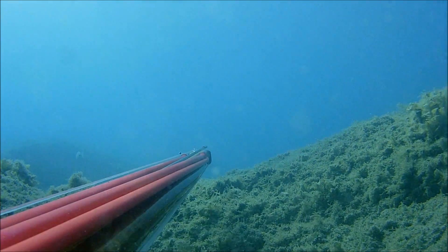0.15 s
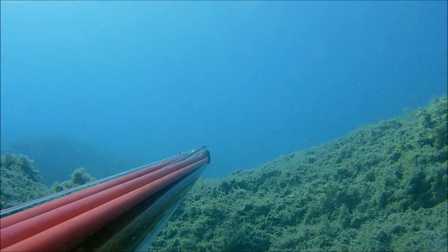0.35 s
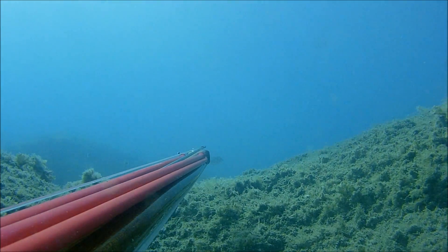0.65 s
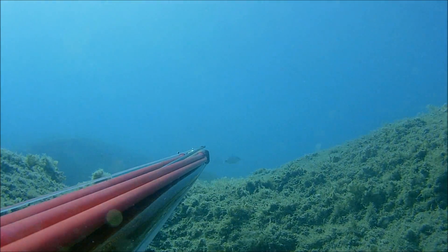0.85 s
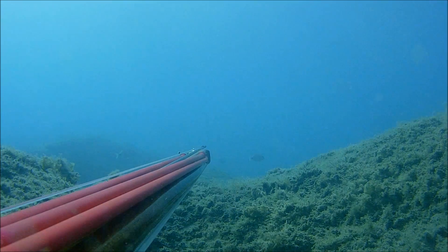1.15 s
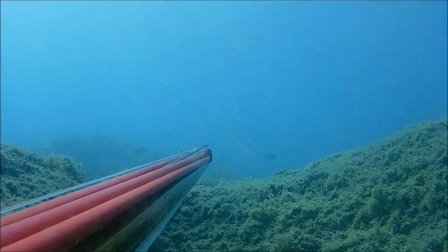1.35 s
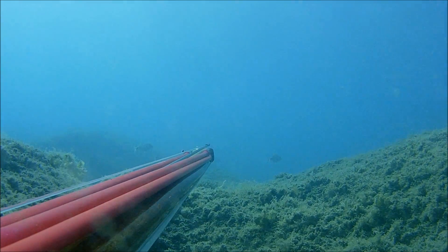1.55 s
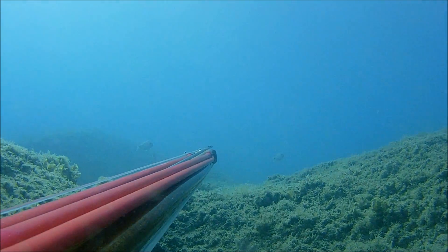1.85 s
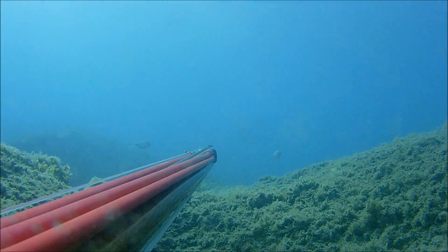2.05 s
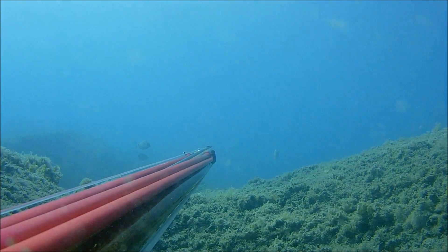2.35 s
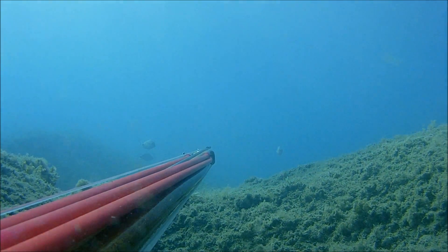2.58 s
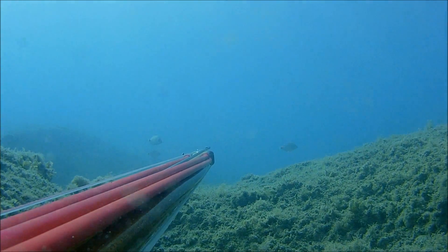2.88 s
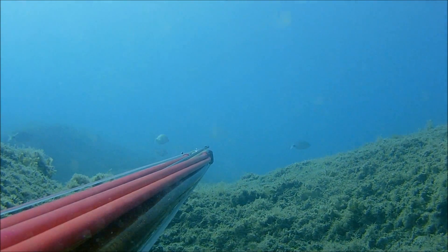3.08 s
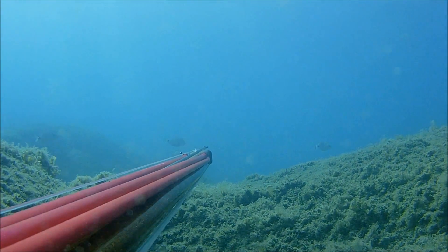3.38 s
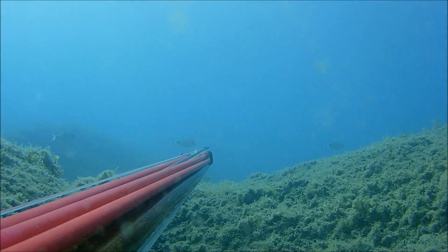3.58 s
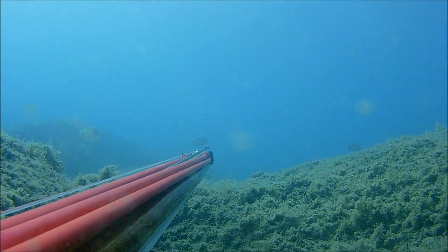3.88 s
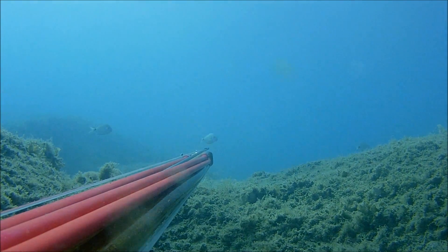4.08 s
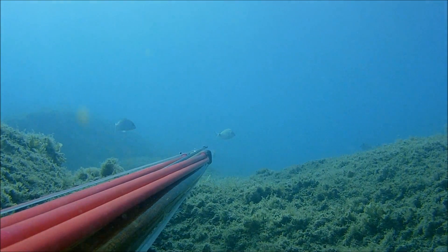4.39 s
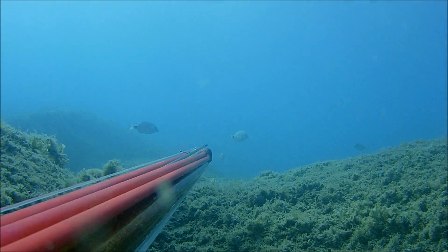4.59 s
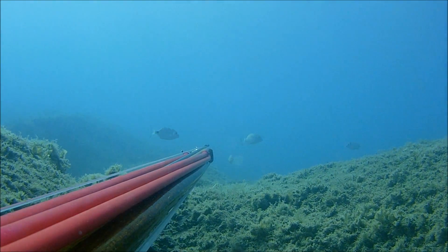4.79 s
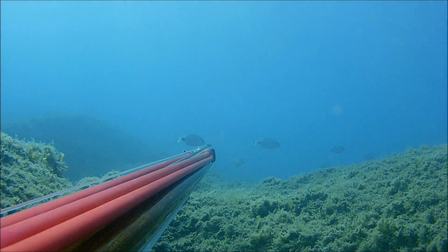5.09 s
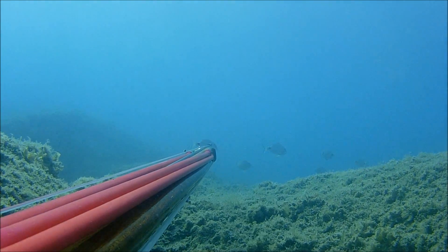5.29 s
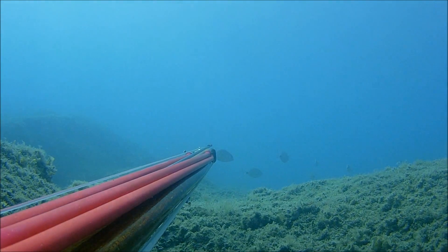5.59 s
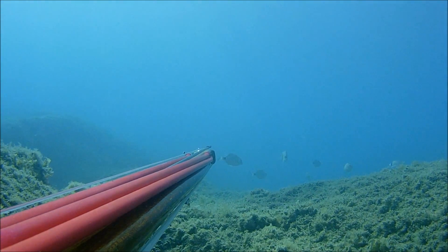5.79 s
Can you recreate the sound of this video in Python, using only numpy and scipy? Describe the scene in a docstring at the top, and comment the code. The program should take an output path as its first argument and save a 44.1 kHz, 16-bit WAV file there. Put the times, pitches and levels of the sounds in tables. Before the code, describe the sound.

A camera mounted on a speargun hears a quiet seabed: scattered shrimp snaps, near and far, like tiny pops and ticks, each with a brief rocky scatter. Low rumble settles early into gentle wash and faint hiss. The loudest snap cracks at about 2.3 seconds, then low handling bumps; later clicks continue unevenly, with another dull bump late. Mono, boxy, with enclosed midrange-to-treble clicks.

```python
"""Weedy, rocky seabed: snapping shrimp crackle, heard by a camera in a waterproof housing on a speargun.
Each snap is a claw rasp and a collapsing bubble, scattered by rocks and filtered by the ringing housing.
Near snaps come from a table, a colony is scattered at random, and far snaps merge into a sizzle.
Dull handling bumps ring the gun's low modes; shaped noise makes a soft wash and a slow rumble of flow."""
import sys
import numpy as np
from scipy import signal
from scipy.fft import rfft, irfft
from scipy.io import wavfile

SR = 44100
rng = np.random.default_rng(int(sys.argv[2]) if len(sys.argv) > 2 else 0)


def to_wav(s):
    """Save 16-bit WAV."""
    ch = np.atleast_2d(s).T  # columns
    pcm = np.round(np.clip(ch, -1, 1) * 32767)  # PCM
    wavfile.write(sys.argv[1], SR, pcm.astype(np.int16))


N = 261962
FRAME = 2048  # samples per snap
BUBBLE_LOW_HZ, BUBBLE_HIGH_HZ = 1900, 8000  # brightness slope acts between these
WALL_ECHO_S, WALL_ECHO_DB = .00082, 2.5


def undb(db):
    """Decibels to amplitude gain."""
    return 10 ** (np.asarray(db) / 20)


def unit(x):
    """Scale to rms 1."""
    return x / np.sqrt(np.mean(x ** 2))


def unit_energy(waves):
    """Scale each row to energy 1."""
    return waves / np.linalg.norm(waves, axis=1, keepdims=True)


def colour(points, hz):
    """Gain of a (Hz, dB) spectrum, interpolated over log frequency."""
    point_hz, level_db = np.transpose(points)
    return undb(np.interp(np.log(hz + 1), np.log(point_hz), level_db))


def resonance(hz, centre_hz, width_hz):
    """Response of one damped mode, 1 at its centre."""
    damping = 1j * hz * width_hz
    return damping / (centre_hz ** 2 - hz ** 2 + damping)


def delay(hz, lag_s):
    """Phase response of a pure delay."""
    return np.exp(-2j * np.pi * hz * lag_s)


def noise(gain):
    """Noise of rms 1 with the spectrum gain(hz)."""
    spectrum = rfft(rng.standard_normal(N))
    return unit(irfft(spectrum * gain(np.fft.rfftfreq(N, 1 / SR)), N))


def add(out, start_s, sound):
    """Mix a sound in from start_s."""
    start = int(np.clip(start_s * SR, 0, N - 1))
    out[start:start + len(sound)] += sound[:N - start]


def bubble_tilt(hz, db_per_octave):
    """Spectral slope of a bubble: small ones snap bright, large ones dull."""
    return undb(db_per_octave * np.log2(np.clip(hz, BUBBLE_LOW_HZ, BUBBLE_HIGH_HZ) / SR))


def snaps(rows, claw_db=-12, claw_lead_s=.0022, rock_t60_s=.042, far_t60_s=.11, far_db=-20, echo_spread=.065):
    """Claw rasp, bubble pulse with its crevice ring, rock echoes and wall echo, through the housing."""
    start_s, level_db, tilt_db_per_oct, ring_hz, ring_db = np.transpose(rows)[:, :, None]
    hz, t = np.fft.rfftfreq(FRAME, 1 / SR), np.arange(FRAME) / SR
    lead_s, level_window_s = .004, .01
    ring_q = 3.9
    chance = rng.standard_normal((len(rows), FRAME))
    spray = chance ** 3  # sparse, uneven spikes

    # the rasp fills the frame's end, which wraps round to precede the collapse
    claw = undb(claw_db) * rfft(unit_energy(spray * (t > t[-1] - claw_lead_s)))

    # fainter snaps are further off: more echo against direct sound, up to a limit
    near_snap_db, near_echo_db, echo_db_per_db, echo_most_db = -40, -4, 1, -2.5
    echo_db = near_echo_db + echo_db_per_db * (near_snap_db - level_db)
    echo_db = np.minimum(echo_db, echo_most_db)
    fade = undb(-60 * t / rock_t60_s) + undb(far_db - 60 * t / far_t60_s)
    fade = fade * (t > .0012) * (t < t[-1] - lead_s)
    rocks = undb(echo_db) * rfft(unit_energy(spray * fade))

    ring = 1 + (undb(ring_db) - 1) * resonance(hz, ring_hz, ring_hz / ring_q)
    bubble = bubble_tilt(hz, tilt_db_per_oct) * ring

    # echo off the case wall, its lag varied from snap to snap
    wall_lag_s = WALL_ECHO_S * (1 + echo_spread * np.tanh(chance[:, :1]))
    wall = 1 + undb(WALL_ECHO_DB) * delay(hz, wall_lag_s)

    spectra = (1 + claw + rocks) * bubble * wall * housing(hz) * delay(hz, lead_s)
    waves = unit_energy(irfft(spectra)) * undb(level_db) * np.sqrt(level_window_s * SR)
    out = np.zeros(N)
    for snap_s, wave in zip(start_s[:, 0], waves):
        add(out, snap_s - lead_s, wave)
    return out


# nearest snaps; level is rms over 10 ms, ring is the bubble's in its crevice:
# (start_s, level_db, brightness_db_per_octave, ring_hz, ring_lift_db)
NEAR_SNAPS = [(.0309, -49.5, 5, 8300, 4), (.2156, -50, 2, 5360, 22), (.2353, -45.5, -15, 2330, 17),
              (.4881, -43.5, 2, 8300, 3), (.6662, -43.5, 2.5, 2700, 5), (.7451, -40.5, -6, 5800, 8),
              (.7616, -40, 3.5, 2720, 5), (.8007, -46.5, 1, 2400, 7), (1.1667, -44.5, -2, 3600, 24),
              (1.3622, -51.5, -8, 3980, 24), (1.4904, -50.5, 6, 3200, 7), (1.5312, -40.5, 3.5, 3520, 6),
              (1.58, -51.5, -2, 2400, 11), (1.7708, -47.5, 9.5, 2660, 12), (1.809, -45, 1, 2400, 7),
              (2.0713, -44.5, 10, 3150, 5.5), (2.2562, -27, 8.5, 3260, 10), (2.3326, -43.5, 5, 3600, 21),
              (2.4976, -47, 4.5, 3300, 14), (2.7637, -41, -6, 5610, 29), (2.8405, -42, 3, 3180, 14),
              (3.032, -47, -3, 4500, 4), (3.159, -40, 4.5, 4100, 29), (3.2834, -42, -1.5, 3660, 13),
              (3.3112, -37.5, -8, 2670, 20), (3.3935, -38, 5, 3260, 8.5), (3.4775, -46.5, 4, 5040, 20),
              (3.5065, -42, -2, 2720, 11), (3.5716, -49, -7, 4500, 4), (3.7267, -45, 1, 5960, 10),
              (3.7557, -48, -3, 8300, 14), (3.9368, -46, -6, 2350, 13), (4.0117, -46, 3.5, 5700, 4),
              (4.0951, -45.5, 0, 2700, 2), (4.1192, -44.5, 4, 3140, 23), (4.3662, -52, 6, 4500, 6),
              (4.4763, -43, -5, 4950, 11.5), (4.7589, -48, 0, 2700, 3), (4.8722, -32.5, 4, 3220, 13),
              (5.0344, -45, 4.5, 3600, 12), (5.5485, -32.5, 4, 3200, 25), (5.7144, -45, -4, 5740, 17)]


def near_snaps():
    """The nearest shrimp: individual bubble collapses."""
    return snaps(NEAR_SNAPS)


# transmission of the housing: (frequency_hz, level_db)
HOUSING_SPECTRUM = [(400, -33), (1300, -21), (1850, -5), (2300, -5), (2750, -1), (3100, -12.5),
                    (3650, -3.5), (4900, -5.5), (5900, -11), (6600, -22.5), (7500, -24), (8600, -15.5),
                    (9700, -25.5), (11000, -45)]
# resonances of the housing: (centre_hz, width_hz, lift_db)
HOUSING_MODES = [(1335, 99, 13), (2338, 81, 8.5), (2823, 103, 9), (3493, 84, 5), (3947, 180, 4.5),
                 (4314, 110, 4), (4820, 110, 0), (5780, 140, 2), (9090, 360, 2.5)]


def housing(hz):
    """Causal case response: a treble band as minimum phase, times a few short rings."""
    # folding the cepstrum forward gives minimum phase
    cepstrum = irfft(np.log(colour(HOUSING_SPECTRUM, hz)))
    cepstrum[1:FRAME // 2] *= 2
    cepstrum[FRAME // 2 + 1:] = 0
    rings = [1 + (undb(lift_db) - 1) * resonance(hz, centre_hz, width_hz)
             for centre_hz, width_hz, lift_db in HOUSING_MODES]
    return np.exp(rfft(cepstrum)) * np.prod(rings, axis=0)


def colony(count=380, nearest_db=-49.5, reach=4.4, falloff_db_per_decade=21,
           tilt_db_per_oct=1.1, tilt_spread_db=5.0, ring_db=7, ring_spread_db=4):
    """Shrimp spread evenly over the seabed: the further out, the more and the fainter their snaps."""
    distance = np.sqrt(1 + (reach ** 2 - 1) * np.linspace(0, 1, count))  # nearest = 1
    start_s = rng.uniform(0, N / SR, count)
    level_db = nearest_db - falloff_db_per_decade * np.log10(distance)
    brightness = tilt_db_per_oct + tilt_spread_db * rng.standard_normal(count)
    ring_hz = 2300 * 4 ** rng.random(count)
    ring_lift_db = ring_db + ring_spread_db * rng.standard_normal(count)
    return snaps(np.column_stack([start_s, level_db, brightness, ring_hz, ring_lift_db]))


def far_reef(level_db=-66.5, tilt_db_per_oct=4.2, size_spread_db=3.5, snaps_per_s=2500):
    """Dense random ticks of either sign, through bubble, wall and housing, merge into a steady sizzle."""
    hz = np.fft.rfftfreq(FRAME, 1 / SR)
    sizes = undb(size_spread_db * rng.standard_normal(N))
    signs = np.sign(rng.standard_normal(N))
    ticks = sizes * signs * (rng.random(N) < snaps_per_s / SR)
    wall = 1 + undb(WALL_ECHO_DB) * delay(hz, WALL_ECHO_S)
    response = irfft(housing(hz) * wall * bubble_tilt(hz, tilt_db_per_oct))[:FRAME // 2]
    return undb(level_db) * unit(signal.fftconvolve(ticks, response)[:N])


# handling bumps: (start_s, peak_db)
BUMPS = [(2.563, -43), (2.591, -40.5), (2.627, -32), (2.636, -42), (2.666, -41), (2.843, -40),
         (2.882, -45.5), (5.666, -40.5), (5.675, -40), (5.687, -33.5)]
# modes of the gun and its mount: (multiple_of_lowest, level_db, t60_s)
GUN_MODES = [(1, 3, .042), (2.05, -4, 0.05), (3, -9.5, .028)]


def bumps(push_s=.0035, lowest_hz=110):
    """Soft-onset knocks on the gun; the water damps its low modes within a few cycles."""
    out, t = np.zeros(N), np.arange(SR // 5) / SR
    ring = np.zeros(len(t))
    for multiple, level_db, t60_s in GUN_MODES:
        ring += undb(level_db - 60 * t / t60_s) * np.cos(2 * np.pi * lowest_hz * multiple * t)
    ring *= 1 - np.exp(-t / push_s)
    ring /= np.abs(ring).max()
    for start_s, peak_db in BUMPS:
        add(out, start_s, undb(peak_db) * ring)
    return out


# wash of the water, relative spectral density: (frequency_hz, level_db_per_hz)
WASH_SPECTRUM = [(20, -1), (48, -8), (75, -2.5), (125, -1), (200, -2), (320, -2.5), (500, -6), (750, -9),
                 (1050, -13.5), (1600, -18), (2300, -21.5), (3200, -23.5), (6000, -29.5), (16000, -44.5)]


def water(sway_hz=26.8, sway_width_hz=12, wash_db=-52.5, rumble_db=-61.5, moving_db=14.5, settle_s=.31):
    """Steady dark wash, plus deep flow rumble that settles as the gun slows to a drift."""
    t = np.arange(N) / SR
    flow = undb(rumble_db + moving_db * np.exp(-t / settle_s))
    rumble = flow * noise(lambda hz: resonance(hz, sway_hz, sway_width_hz) ** 2)
    wash = undb(wash_db) * noise(lambda hz: colour(WASH_SPECTRUM, hz))
    return rumble + wash


def scene():
    """Near and distant shrimp, the handled gun and the water, in one channel."""
    return (near_snaps() + colony() + far_reef() + bumps() + water())[None]


def record(dry, hiss_db=-68.5, top_hz=15900):
    """The camera adds faint white hiss and cuts the top with a steep low-pass."""
    hiss = undb(hiss_db) * rng.standard_normal(dry.shape)
    low_pass = signal.ellip(10, .2, 70, top_hz, fs=SR, output="sos")
    return signal.sosfilt(low_pass, dry + hiss)


dry = scene()
out = record(dry)
to_wav(out)
```